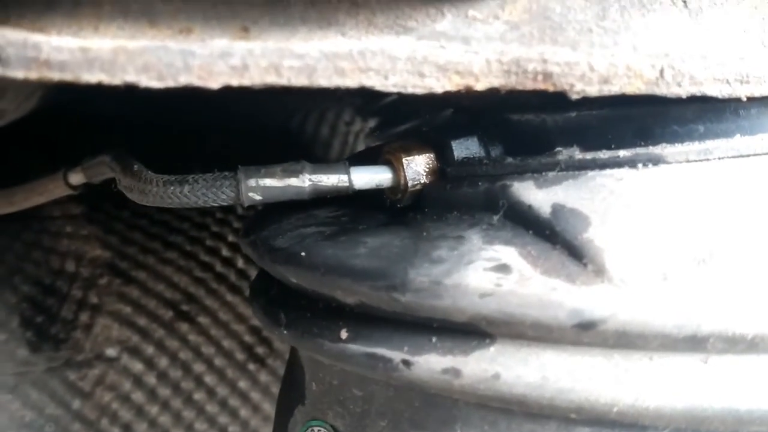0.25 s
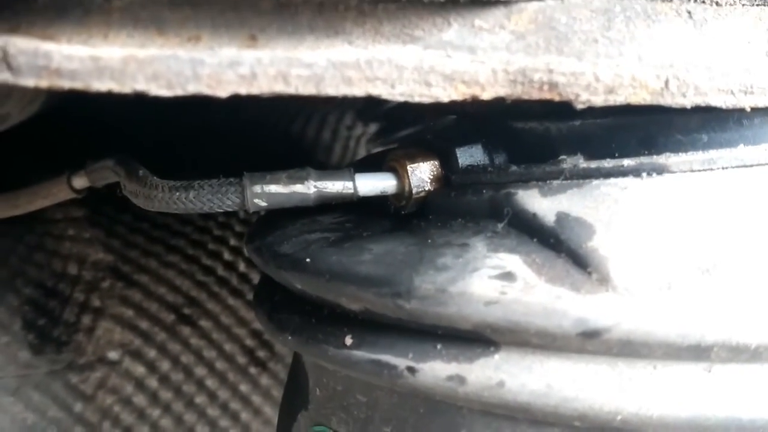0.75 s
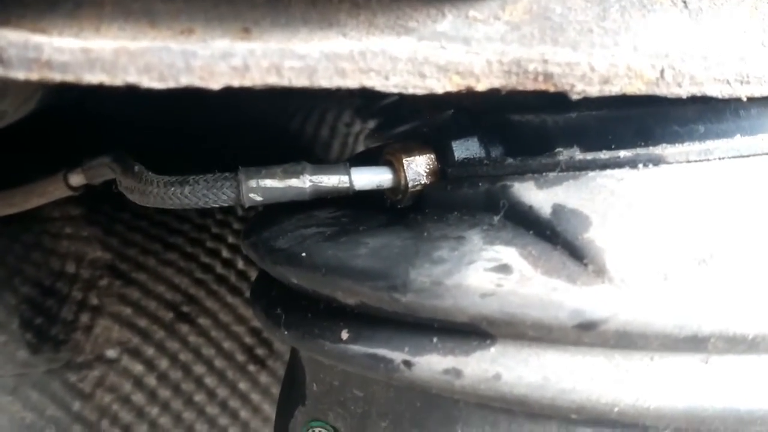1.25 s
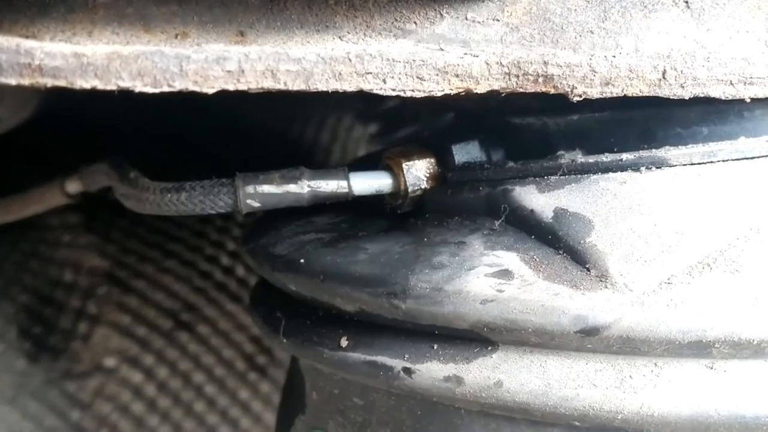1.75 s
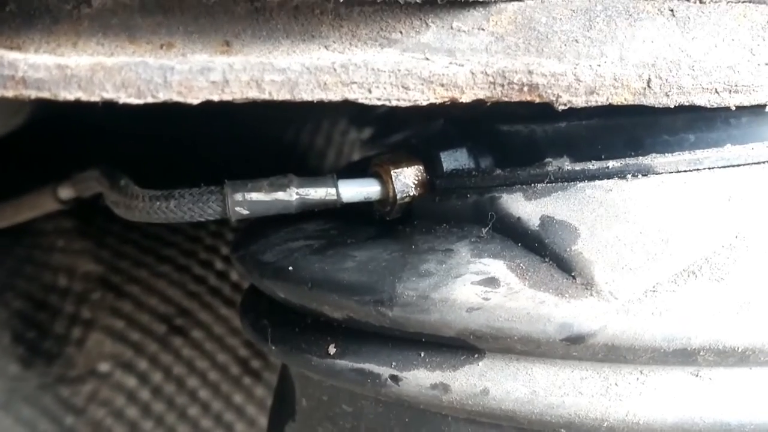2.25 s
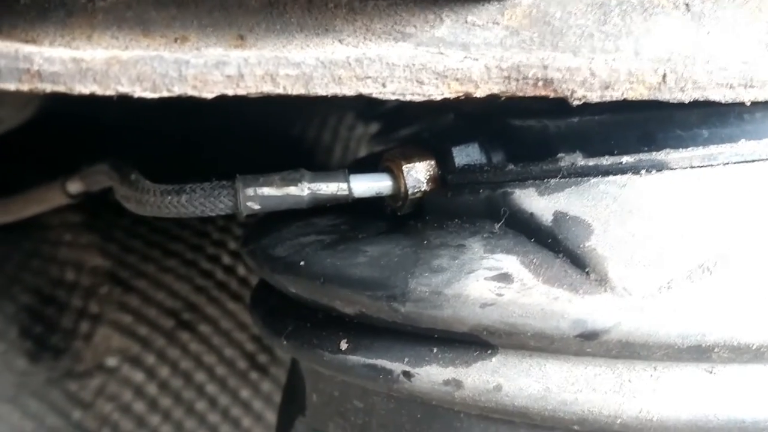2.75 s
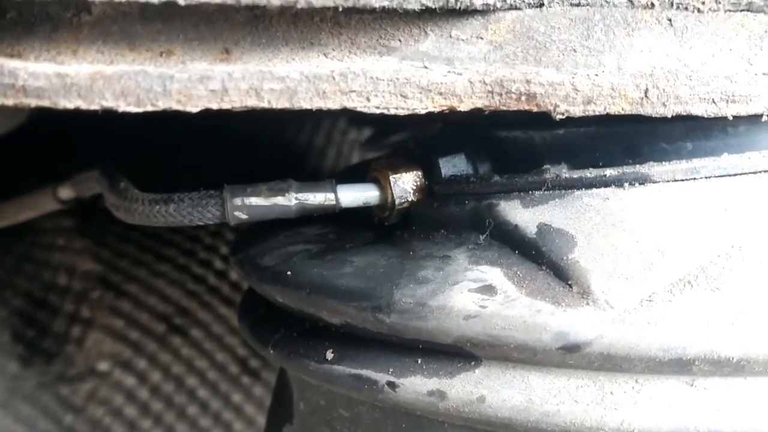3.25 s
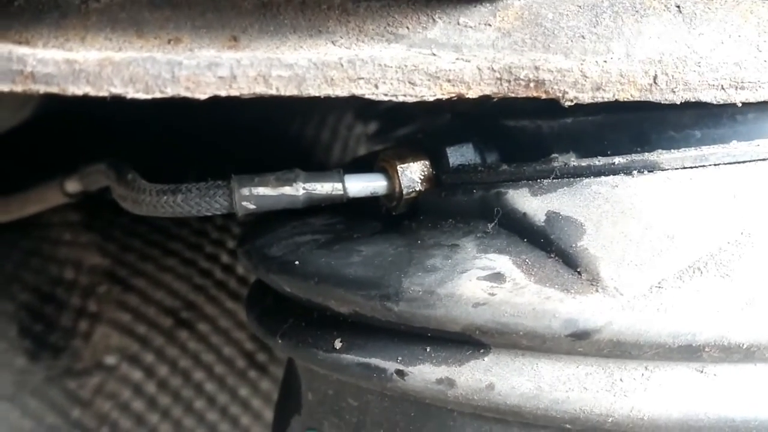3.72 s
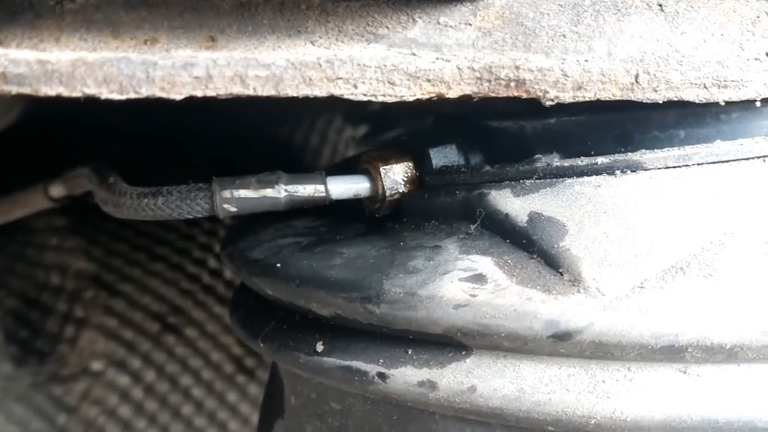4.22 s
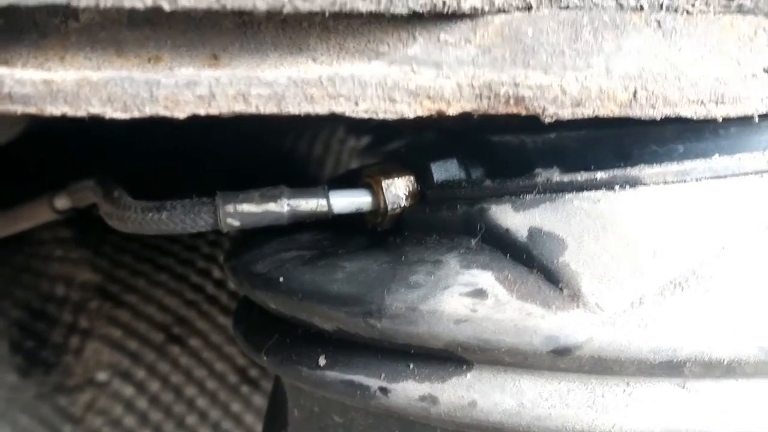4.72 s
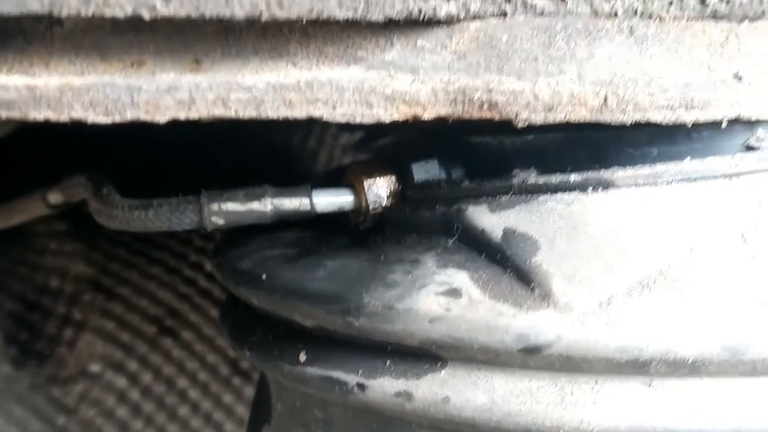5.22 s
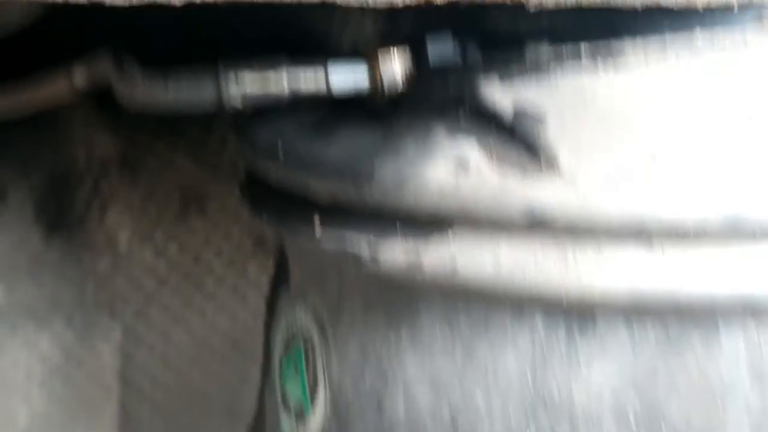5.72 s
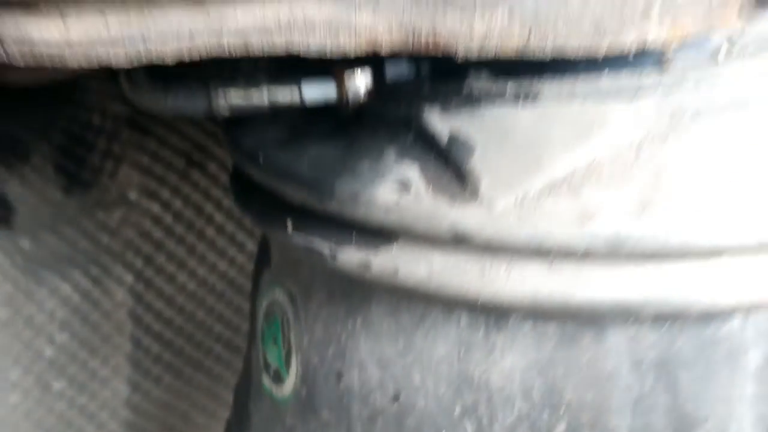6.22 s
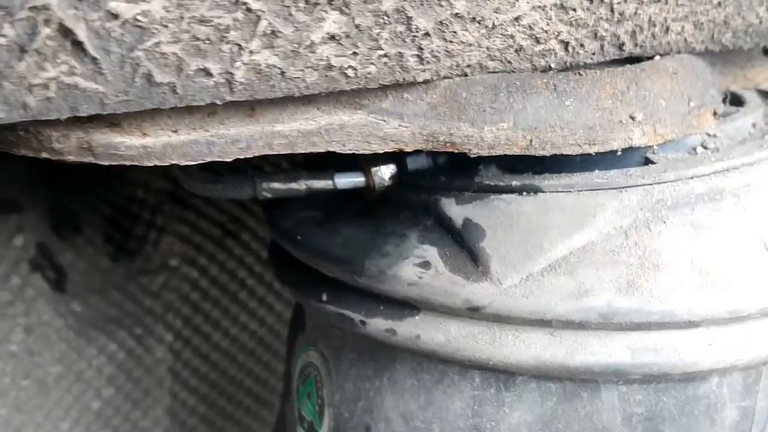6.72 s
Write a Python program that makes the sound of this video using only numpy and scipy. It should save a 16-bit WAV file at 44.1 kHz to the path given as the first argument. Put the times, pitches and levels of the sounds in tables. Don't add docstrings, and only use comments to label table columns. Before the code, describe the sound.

Bright pressurized air hisses steadily from a loosened fitting beneath a car, its tone shifting late as wind puffs thump the swinging handheld microphone.

```python
import sys
import numpy as np
from scipy import signal
from scipy.io import wavfile
from scipy.ndimage import uniform_filter1d

SR = 44100
rng = np.random.default_rng(int(sys.argv[2]) if len(sys.argv) > 2 else 0)


def makeup_ratio(level_db):
    decades = np.asarray(level_db, float) / 20
    return 10 ** decades


def unload_audio(sound):
    columns = np.transpose(np.atleast_2d(sound))
    steps = np.round(np.clip(columns, -1, 1) * 32767)
    wavfile.write(sys.argv[1], SR, steps.astype(np.int16))


N = 307377
FRAME, HOP = 2048, 512


def rms_one(x):
    return x / np.sqrt(np.mean(x ** 2) + 1e-20)


def in_time(rows, s):
    at, *columns = np.transpose(rows)
    return [np.interp(s, at, column) for column in columns]


def at_hz(points, hz):
    point_hz, value = np.transpose(points)
    return np.interp(np.log(hz + 1), np.log(point_hz), value)


def drift(s, rate, count):
    knots = np.arange(-1, s[-1] * rate + 2) / rate
    return np.array([np.interp(s, knots, row) for row in rng.standard_normal((count, len(knots)))])


def noise_frames():
    hz, s, frames = signal.stft(rng.standard_normal(N), SR, nperseg=FRAME, noverlap=FRAME - HOP)
    return hz[:, None], s, frames


def to_sound(frames):
    return signal.istft(frames, SR, nperseg=FRAME, noverlap=FRAME - HOP)[1][:N]


def panned(left, right, pan_db):
    share = 1 / (1 + makeup_ratio(-2 * pan_db))
    return np.array([left * np.sqrt(2 * share), right * np.sqrt(2 - 2 * share)])


def swells(rows, t):
    return np.array([makeup_ratio(2 * row[1]) * np.exp(-((t - row[0]) / row[2]) ** 2) for row in rows])


def comb_db(modes, hz):
    grid = np.arange(0, SR / 2, 10.)
    total = 0
    for mid_hz, width_hz, db in modes:
        total = total + db * np.exp(-4 * np.log(2) * ((grid - mid_hz) / width_hz) ** 2)
    return np.interp(hz, grid, total)


def near_comb_db(hz, port):
    # centre in Hz, width in Hz, level in dB.
    near_left = [(3560, 150, -1.5), (4163, 1188, 2.7), (4230, 190, -7.5), (4314, 88, -4.7), (5143, 100, -6),
                 (5296, 441, 3.6), (5665, 80, -5.4), (5985, 108, -11), (6123, 136, 8.2), (6559, 166, 6.2),
                 (6310, 110, -6), (6900, 137, -12), (7076, 213, 6.5), (7366, 86, -5.6), (7688, 167, 3.2),
                 (7928, 83, -3.7), (8115, 175, 2.9), (8875, 215, -7.7), (9699, 933, 4.5),
                 (10200, 445, -7.8), (10850, 177, 2.8), (11333, 180, 6.0), (11566, 361, -3.1),
                 (12466, 95, -3.9), (13180, 121, 3.5), (13518, 161, 2.7), (14133, 261, -4.7),
                 (14828, 1433, 1.2), (15339, 276, -3.2)]
    near_right = [(1358, 286, -7.2), (1715, 445, 6.5), (2599, 118, 6.0), (2870, 215, -5.3),
                  (3535, 250, -5.0), (3960, 193, 5.1), (4493, 210, 5.4), (6008, 94, -3), (6335, 103, 5.7),
                  (6720, 130, -5), (4860, 110, -6), (5300, 110, -5), (4230, 160, -6.5), (7132, 273, 9.5),
                  (7400, 208, -13), (7650, 110, -6), (7968, 278, 11.2), (8340, 240, -13), (8793, 528, 5.7),
                  (9136, 115, -9.2), (9362, 124, 8.0), (9723, 87, -9.9), (9858, 326, 8.5),
                  (10192, 1499, -4.5), (10934, 838, 5.9), (11331, 124, -9.3), (12546, 346, -5.4),
                  (13207, 782, 4.2), (14152, 144, -6.4), (14821, 123, -7.4), (15161, 290, -6.6),
                  (15490, 1071, 3.7)]
    # centre in Hz, width in Hz, level in dB.
    more_left = [(1033, 100, 2.7), (1421, 1800, -1.1), (2928, 100, -2.1), (3402, 100, 2.4),
                 (3617, 450, -3.0), (3919, 100, -2.4), (4200, 160, -3), (4478, 100, -2.6),
                 (5124, 100, -3.0), (5598, 150, 3.6), (5857, 150, 2.9), (5986, 100, -3.7), (6201, 100, 4.0),
                 (6503, 150, -2.1), (6890, 100, -2.7), (7450, 150, -2.3), (8570, 150, 2.1),
                 (8957, 100, -3.3), (10465, 900, -1.4), (10895, 100, 2.3), (12316, 150, 2.2),
                 (12747, 100, 2.6), (13006, 150, -1.9), (13738, 100, -2.7), (14254, 250, -1.8),
                 (15676, 150, 2.8)]
    more_right = [(861, 150, -2.9), (1335, 150, 4.7), (2067, 1800, -1.0), (2842, 100, 4.6),
                  (3143, 100, -3.3), (3488, 250, -1), (3962, 100, -2.9), (4220, 100, 4.2),
                  (4521, 100, -3.5), (4780, 250, 2.2), (5038, 1800, 1.6), (5297, 100, 2.6),
                  (5469, 150, -2.6), (6632, 100, 4.1), (7235, 100, 3.0), (7665, 100, -2.6),
                  (8096, 150, 3.3), (8484, 100, 3.5), (8914, 250, 2.1), (9733, 100, -3.5),
                  (10637, 100, -2.8), (11197, 100, 3.3), (12489, 100, 2.5), (12661, 100, -3.5),
                  (13867, 150, -2.3), (14685, 150, 2.4)]
    return comb_db((near_left + more_left, near_right + more_right)[port], hz)


def low_comb_db(hz, port):
    # centre in Hz, width in Hz, level in dB.
    low_left = [(2570, 1161, 3.2), (3300, 142, -5.1), (3745, 599, 3.6), (4646, 104, -6.6), (4791, 179, 3.0),
                (5131, 134, -11.9), (5205, 81, -5.2), (5754, 138, -9.5), (5837, 123, -8.0),
                (6093, 273, 8.7), (6321, 287, -7.8), (6953, 285, 7.3), (7408, 143, -8.9), (8032, 375, 3.0),
                (9408, 286, 4.2), (10265, 463, -3.5), (11463, 183, 4.1), (11992, 804, -3.7),
                (12769, 225, 3.1), (14847, 201, 2.5)]
    low_right = [(2930, 592, 6.1), (3287, 152, -9.6), (3785, 651, 3.4), (5176, 249, -4.0),
                 (6158, 104, -4.1), (6593, 488, 3.4), (6798, 214, -4.8), (7857, 299, 6.2),
                 (8158, 114, -3.5), (8297, 613, 2.3), (8669, 276, 7.3), (9480, 188, -2.8),
                 (10288, 579, -3.5), (11031, 267, 3.0), (12029, 1499, -3.5), (12949, 684, 4.0),
                 (13727, 218, -3.4), (14656, 788, -4.1), (15075, 107, -5.4), (15733, 1327, 1.2)]
    # centre in Hz, width in Hz, level in dB.
    more_left = [(3143, 100, -2.8), (3186, 450, 3.0), (4435, 100, 3.7), (5167, 250, 3.6), (5770, 150, 8.8),
                 (6244, 100, -5.0), (6675, 150, -2.5), (6933, 150, 2.5), (7192, 150, -3.0),
                 (7407, 150, 7.4), (9130, 150, -4.0), (9905, 100, -3.5), (11455, 1800, 0.9),
                 (12273, 150, 2.3)]
    more_right = [(2540, 250, 3.1), (3100, 250, 3.1), (3488, 250, 6.6), (3962, 450, -1.8),
                  (5124, 1800, 2.7), (5684, 150, -4.2), (6287, 150, 4.2), (7407, 150, 3.2),
                  (7579, 100, -4.9), (8354, 450, 4.3), (9173, 250, 3.8), (9991, 250, -2.9),
                  (10723, 100, -4.1), (15719, 1800, 3.0)]
    return comb_db((low_left + more_left, low_right + more_right)[port], hz)


def sweeps_db(hz, s, port, width_hz):
    # from in seconds, to in seconds, from in Hz, to in Hz, depth in dB.
    sweeps_left = [(4.4, 6.3, 11800, 17000, -12), (5.5, 7.1, 14000, 12450, -9),
                   (5.0, 5.65, 14000, 13800, -12), (5.8, 6.45, 7400, 7450, -5), (6.4, 7.1, 8200, 8600, -10),
                   (6.3, 7.0, 13000, 14800, 0), (4.3, 6.25, 14000, 9900, -8), (6.5, 7.8, 13250, 16000, -9),
                   (7.6, 7.0, 15150, 15250, -14), (5, 7.8, 15000, 11200, -10), (6.45, 7.0, 6600, 7300, -13)]
    sweeps_right = [(3.7, 6.3, 12500, 11900, -13), (6.5, 6.1, 10100, 10600, -9), (5.3, 6.3, 7800, 7100, -3),
                    (5.5, 6.0, 16000, 13900, -13), (6.3, 6.9, 14100, 14400, -10),
                    (6.2, 7.2, 7100, 7000, -12), (5.0, 7.3, 8300, 11000, -13), (4.3, 5.9, 6900, 7500, -5),
                    (6.45, 7.1, 10650, 10750, -12), (5.6, 6.2, 14100, 15000, -8),
                    (6.0, 6.35, 8100, 9900, -14), (6.3, 7.0, 14900, 15300, -13),
                    (6.8, 7.3, 9300, 10200, -8), (5.8, 7.0, 13300, 13800, -9), (6.6, 7.0, 9700, 12300, -12),
                    (7.3, 9.3, 14000, 12800, -12)]
    total = 0
    for start, end, from_hz, to_hz, db in (sweeps_left, sweeps_right)[port]:
        way = np.clip((s - start) / (end - start), 0, 1)
        fade = np.sqrt(np.sin(np.pi * way) + 1e-9)
        notch_hz = from_hz + (to_hz - from_hz) * way
        total = total + db * fade * np.exp(-((hz - notch_hz) / width_hz) ** 2)
    return total


def staged_ripples_db(hz, s, port):
    # centre in Hz, width in Hz, level in dB.
    early_left = [(2710, 100, -1.6), (3230, 250, -1.8), (3450, 100, -1.8), (3620, 100, 2.6),
                  (3880, 100, 1.9), (4260, 150, 7.3), (4820, 150, -2.0), (5080, 150, 2.4),
                  (5560, 100, -3.0), (5730, 100, 2.7), (5860, 100, -2.8), (6030, 100, 2.0),
                  (6240, 100, -2.8), (6370, 100, 3.1), (6760, 100, -3.7), (6930, 100, 3.2),
                  (7450, 100, 1.7), (7880, 250, -1.2), (8440, 150, -3.1), (8830, 100, -1.7),
                  (8960, 150, 1.5), (10340, 100, 2.3), (12020, 100, 2.5), (13820, 100, 1.7),
                  (14080, 100, 1.6), (14300, 100, 3.1)]
    early_right = [(2580, 450, -3.3), (2840, 100, -3.0), (2970, 100, 2.8), (3570, 150, 7.6),
                   (3790, 100, -3.7), (4690, 150, -2.6), (4910, 150, 3.4), (5340, 150, 4.7),
                   (5900, 250, 2.6), (6630, 150, -2.4), (6760, 100, 5.6), (7280, 100, -9.9),
                   (7540, 250, 7.0), (8050, 250, -2.1), (8180, 100, -8.5), (8310, 150, 5.0),
                   (8480, 150, 2.2), (8610, 100, -4.5), (9000, 250, -2.4), (9520, 100, -3.3),
                   (10470, 100, 2.6), (11280, 100, -4.4), (11970, 100, -3.7), (12790, 150, 3.1),
                   (14770, 100, -4.3), (15250, 450, 2.9)]
    # centre in Hz, width in Hz, level in dB.
    middle_left = [(3230, 150, 2.9), (5210, 150, 3.9), (5770, 150, 3.3), (6240, 150, -3.6), (6460, 250, 2.5),
                   (7190, 150, -4.9), (9040, 900, -2.4), (10120, 450, -1.9), (10550, 250, 4.2),
                   (12100, 150, -4.6), (12490, 250, 6.6), (15120, 250, -2.8)]
    middle_right = [(3270, 150, 6.2), (4740, 150, 5.4), (5040, 150, -4.1), (5250, 250, 4.4),
                    (6030, 250, 6.3), (6850, 150, 4.8), (8400, 150, -5.5), (8870, 450, -2.2),
                    (9260, 150, 4.9), (12100, 150, -3.7), (13390, 250, 2.8), (14770, 450, 2.1)]
    # centre in Hz, width in Hz, level in dB.
    late_left = [(3360, 900, -2.8), (4310, 250, 3.7), (5040, 150, 5.4), (5210, 150, -5.5),
                 (5640, 150, -3.9), (5990, 150, 4.0), (6200, 150, -7.1), (6370, 150, 4.4),
                 (6930, 150, 6.0), (7190, 150, -7.3), (9260, 450, 2.3), (9820, 250, -3.7),
                 (10470, 150, 5.8), (11070, 150, 3.3), (11150, 900, -4.1), (11890, 450, 6.7),
                 (14170, 900, 2.3), (15420, 450, 6.0)]
    late_right = [(3400, 150, 4.8), (3570, 150, -5.2), (4440, 250, 6.4), (4780, 250, -6.7),
                  (6070, 250, 5.5), (6460, 150, -6.4), (6930, 250, 3.7), (7240, 150, -5.7),
                  (7320, 900, 5.3), (8400, 250, 6.1), (9600, 150, 5.1), (10080, 450, -6.0),
                  (11540, 250, 3.9), (12190, 450, -4.2), (12920, 150, 5.0), (13050, 900, -4.7),
                  (15200, 150, 5.5), (15420, 150, -6.3)]
    swing_from_s, settle_from_s, blend_s, depth = 5.5, 6.4, 0.27, 0.75
    swung = np.clip((s - swing_from_s) / blend_s + .5, 0, 1)
    settled = np.clip((s - settle_from_s) / blend_s + .5, 0, 1)
    still, swing, settle = [(early_left, middle_left, late_left), (early_right, middle_right, late_right)][port]
    ripples = (1 - swung) * comb_db(still, hz)
    ripples = ripples + (swung - settled) * comb_db(swing, hz)
    ripples = ripples + settled * comb_db(settle, hz)
    return depth * ripples


def far_echoes(hz, s, travel, count):
    # first echo in seconds, last in seconds, level of each in dB, path change in seconds over the move.
    echo_range = (.002, 0.02, -17, -0.1)
    first, last, level_db, change = echo_range
    delays = rng.uniform(first, last, (count, 1)) + change * rng.standard_normal((count, 1)) * travel
    bright = hz ** 2 / (hz ** 2 + 1800 ** 2)
    echoes = sum(np.exp(-2j * np.pi * (hz * delay).astype(np.float32)) for delay in delays)
    return 1 + bright * makeup_ratio(level_db) * echoes


def leak(t):
    # time in seconds, hiss in dB, left-right in dB.
    leak_level = [
        (0.0, -38.5, 8.5),
        (0.15, -40, 6.5),
        (1.38, -40, 8),
        (2.66, -40, 7.5),
        (5.28, -40, 6.5),
        (6.48, -41, 5),
        (6.68, -41, 5),
        (6.97, -41, 7),
    ]
    # time in seconds, place from 0 near the fitting to 1 lowered, stretch of the echo comb in %.
    hand = [
        (0, 0.016, 0.26),
        (2.5, 0.0097, 0.092),
        (4.9, 0.02, 0.0075),
        (5.5, 0.12, 0.06),
        (5.9, 0.73, 1),
        (6.2, 0.97, -0.88),
        (6.5, 0.32, 2),
        (6.75, 0.47, -1),
        (6.97, 0.68, 2),
    ]
    # frequency in Hz, level in dB per Hz.
    jet_left = [(300, -23), (700, -25.5), (1400, -21), (2500, -20.5), (4000, -20), (5500, -15),
                (7000, -8.5), (8500, -0.8), (10000, 1), (12000, -2.5), (14000, -3.5), (15700, -5.5)]
    jet_right = [(300, -27), (700, -16.5), (1400, -19), (2500, -14.5), (4000, -13), (5500, -12.5),
                 (7000, -13), (8500, -8), (10000, 1), (12000, -0.3), (14000, -2), (15700, -7.5)]
    # frequency in Hz, share common to both ports (0 to 1).
    likeness = [(300, 0.6), (1000, 0.45), (3000, 0.45), (6000, .42), (9500, .65), (11000, 0.55),
                (15000, 0.34)]
    lead_s, phase_turn = 0.00001, 2.5

    hz, s, common = noise_frames()
    place, stretch = in_time(hand, s)
    place, alike = np.clip(place, 0, 1), np.clip(at_hz(likeness, hz), 0, 1)
    late = np.exp(-2j * np.pi * hz * lead_s)
    cut = 1 / np.sqrt(1 + (220 / (hz + 1)) ** 4)
    band = np.minimum(np.searchsorted(np.geomspace(300, 16000, 24), hz[:, 0]), 23)
    ports = []
    for port, (jet, lag) in enumerate([(jet_left, 1), (jet_right, late)]):
        tremor = 0.22 * drift(s, rate=4.1, count=1)[0]
        seen_hz = hz / (1 + (stretch + tremor) / 100)
        comb = (1 - place) * near_comb_db(seen_hz, port) + place * low_comb_db(seen_hz, port)
        comb = comb + sweeps_db(hz, s, port, width_hz=120) + staged_ripples_db(hz, s, port)
        turbulence_db = 0.5 * drift(s, rate=9.0, count=24)[band]
        echoes = far_echoes(seen_hz, s, place + .3 * stretch + .9 * tremor, count=4)
        phase = phase_turn * np.log(10) / 20 * signal.hilbert(near_comb_db(hz[:, 0], port)).imag
        turn = np.exp(1j * phase)[:, None]
        shared = np.clip(alike * makeup_ratio(.7 * comb), 0, .95)
        own = noise_frames()[2]
        mix = np.sqrt(shared) * common * lag * turn + np.sqrt(1 - shared) * own
        colour = makeup_ratio(at_hz(jet, hz) + 0.91 * comb + turbulence_db)
        ports.append(rms_one(to_sound(mix * echoes * cut * colour)))
    hiss_db, pan_db = in_time(leak_level, t)
    flutter_db = 0.15 * drift(t, rate=30.0, count=1)[0]
    return makeup_ratio(hiss_db + 3.0 + flutter_db) * panned(*ports, pan_db)


def rumble(t):
    # frequency in Hz, level in dB per Hz.
    rumble_colour = [(7.1, -9.5), (12, 5), (48, -2), (139, -7.5), (300, -23), (500, -25), (650, -69),
                     (1100, -120)]
    # time in seconds, peak in dB, length in seconds, left-right in dB.
    buffet_rows = [(0.0, -59, 0.046, 11), (0.163, -59, 0.059, 18), (0.304, -64, .03, 11),
                   (.48, -65.5, .05, 14), (2.964, -59.5, 0.028, 3), (3.07, -64, .02, 3),
                   (4.53, -56, 0.066, 2), (6.45, -56.5, .09, 10), (6.67, -53.5, 0.07, 15),
                   (6.833, -50, 0.017, 23), (6.93, -52.5, 0.076, 15)]
    calm_db, calm_pan_db, calm_lump_db = -64.5, 1.5, 1

    hz, s, common = noise_frames()
    colour = makeup_ratio(at_hz(rumble_colour, hz))
    left, right = [rms_one(to_sound(colour * (0.72 * common + 0.73 * noise_frames()[2]))) for port in range(2)]
    calm = makeup_ratio(2 * (calm_db + calm_lump_db * drift(s, rate=12.0, count=1)[0]))
    buffets = swells(buffet_rows, s)
    power = calm + buffets.sum(axis=0)
    pan_db = (calm * calm_pan_db + np.array(buffet_rows)[:, 3] @ buffets) / power
    gain, pan_db = np.interp(t, s, np.sqrt(power)), np.interp(t, s, pan_db)
    flutter_db = 1.0 + 1.5 * drift(t, rate=30.0, count=1)[0]
    return gain * makeup_ratio(flutter_db) * panned(left, right, pan_db)


def puffs(t):
    # time in seconds, peak in dB, length in seconds, left-right in dB, push 1 or pull -1.
    puff_rows = [(.03, -44.5, 0.016, 15, -1), (.114, -44, 0.0066, 18, 1), (.15, -43.5, .009, 18, -1),
                 (0.198, -37.5, 0.0096, 22, -1), (0.448, -48, .007, 14, 1), (0.505, -44.5, .012, 14, 1),
                 (2.947, -44.5, 0.0069, 3, 1), (4.504, -49, .008, 2, -1), (4.574, -46, 0.018, 4, 1),
                 (6.498, -43, 0.015, 9, -1), (6.655, -37, 0.0082, 18, 1), (6.676, -36.5, 0.0087, 21, 1),
                 (6.735, -43, .012, 15, 1), (6.827, -37.5, .012, 21, -1), (6.839, -32, 0.0053, 23, 1),
                 (6.901, -36.5, 0.0032, 12, 1), (6.952, -37, 0.0071, 16, 1), (6.965, -40.5, 0.0055, 17, 1)]
    out = np.zeros((2, N))
    for s, db, length, pan_db, way in puff_rows:
        u = (t - s) / length * 2.33
        swing = (1 - u ** 2) * np.exp(-u ** 2 / 2)
        out += np.sign(way) * makeup_ratio([[db], [db - pan_db]]) * swing
    return out


def brushes(t):
    # time in seconds, level in dB, length in seconds.
    strokes = [
        (.04, -72, 0.054),
        (5.56, -66, 0.066),
        (5.72, -66.5, 0.25),
        (5.81, -65, 0.047),
        (6.66, -69.5, .08),
        (6.85, -66, 0.12),
    ]
    low_hz, high_hz = 700, 4350
    hollow_hz, hollow_width_hz, hollow_db = 722, 60, -82

    hz, s, common = noise_frames()
    slope = 1 / np.sqrt((1 + (low_hz / (hz + 1)) ** 4) * (1 + (hz / high_hz) ** 4))
    rustle = np.sqrt(swells(strokes, s).sum(axis=0)) * makeup_ratio(14.5) * slope
    hollow_level = makeup_ratio(hollow_db + 24 + 3.4 * drift(s, rate=3.4, count=1)[0])
    hollow = hollow_level / (1 + ((hz - hollow_hz) / hollow_width_hz) ** 2)
    ports = []
    for port_db in (-1.5, 1.5):
        noise = 0.89 * common + 0.5 * noise_frames()[2]
        ports.append(makeup_ratio(port_db) * to_sound((rustle + hollow) * noise))
    return np.array(ports)


def scene():
    t = np.arange(N) / SR
    return leak(t) + rumble(t) + puffs(t) + brushes(t)


def spectral_gate(x):
    # frequency in Hz, threshold in dB against the surrounding band.
    gate_curve = [(300, -10.5), (700, -1.5), (1400, -1), (2500, 2.5), (3600, 4.5), (5000, 4.5), (6200, 3),
                  (7500, -0.5), (9000, -5.5), (12000, -5.5), (15000, 0)]
    port_offset_db = [-.4, 1.4]
    block, block_start, cutoff_hz = 1024, 824, 15765
    wander_db, wander_per_s, patch_margin_db = 1.3, 14.0, -5.5

    n, k = np.arange(2 * block)[:, None], np.arange(block)
    window = np.sin(np.pi * (n + .5) / (2 * block))
    basis = window * np.cos(np.pi / block * (n + .5 + block / 2) * (k + .5))
    front, hz = 2 * block - block_start, (k + .5) * SR / (2 * block)
    padded = np.pad(x, ((0, 0), (front, 2 * block - (front + N) % block)))
    halves = padded.reshape(2, -1, block)
    lines = np.concatenate([halves[:, :-1], halves[:, 1:]], axis=2) @ basis

    around = uniform_filter1d(np.log(lines ** 2 + 1e-20), size=61, axis=2)
    around = uniform_filter1d(around, size=9, axis=1)
    level = np.exp(around / 2) * 1.89
    frame_s = np.arange(lines.shape[1]) * block / SR
    wander = drift(frame_s, wander_per_s, count=128).reshape(2, 64, -1)
    wander = np.repeat(wander, block // 64, axis=1).transpose(0, 2, 1)
    limit_db = at_hz(gate_curve, hz) + np.reshape(port_offset_db, (2, 1, 1)) + wander_db * wander
    limit = level * makeup_ratio(limit_db)
    patch = np.sqrt(uniform_filter1d(uniform_filter1d(lines ** 2, size=5, axis=2), size=3, axis=1))
    strong = (np.abs(lines) > limit) * (patch > limit * makeup_ratio(patch_margin_db))
    kept = lines * strong * (hz < cutoff_hz)
    back = kept @ basis.T * 2 / block
    joined = (back[:, 1:, :block] + back[:, :-1, block:]).reshape(2, -1)
    return joined[:, front - block:][:, :N]


def top_cut(x):
    return signal.sosfilt(signal.butter(12, 15825, fs=SR, output="sos"), x)


def record(dry):
    return top_cut(spectral_gate(dry))


dry = scene()
out = record(dry)
unload_audio(out)
```